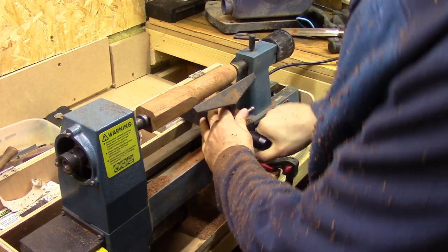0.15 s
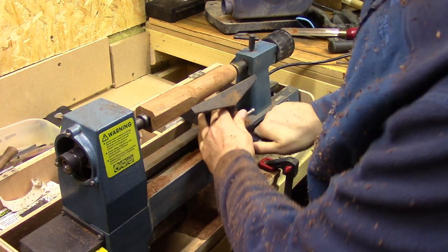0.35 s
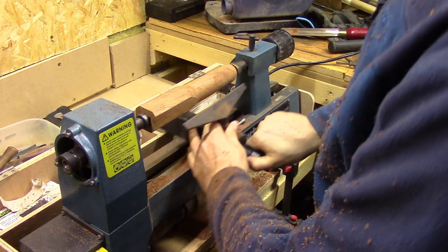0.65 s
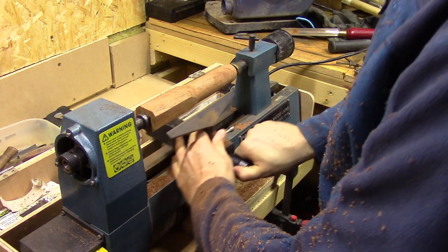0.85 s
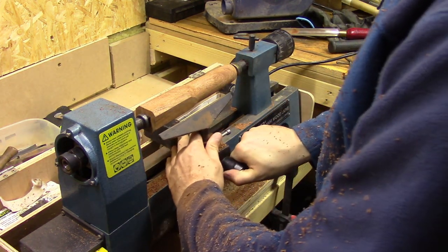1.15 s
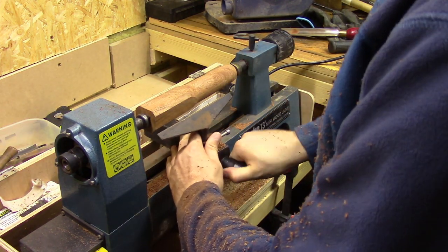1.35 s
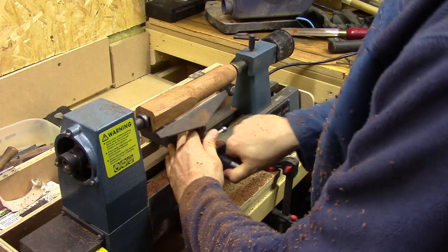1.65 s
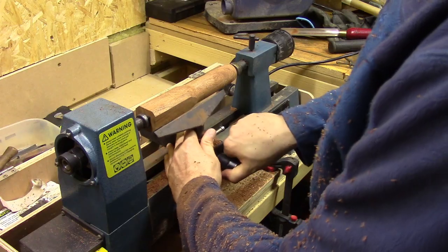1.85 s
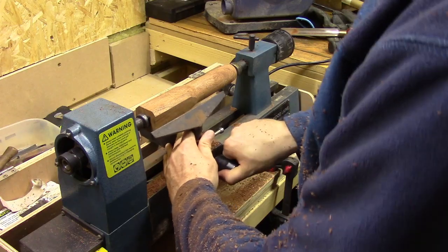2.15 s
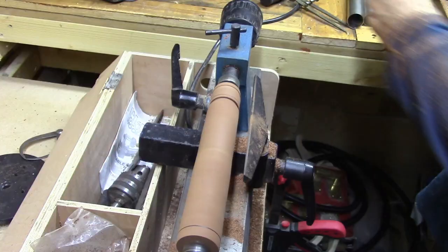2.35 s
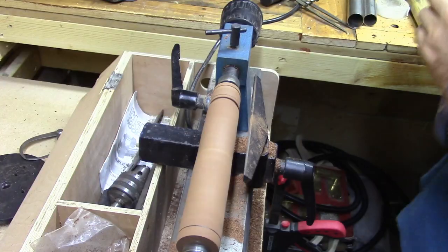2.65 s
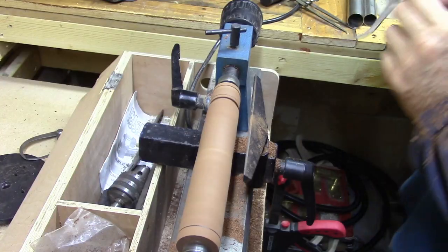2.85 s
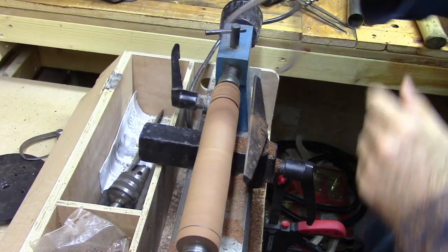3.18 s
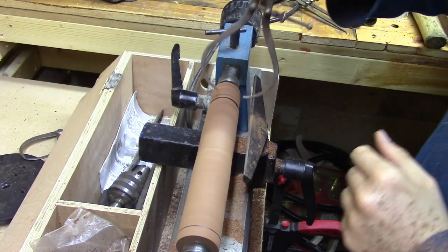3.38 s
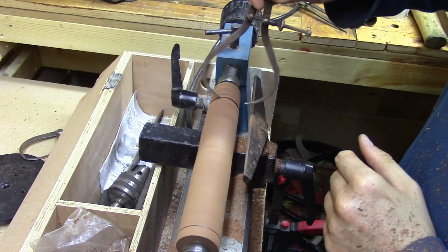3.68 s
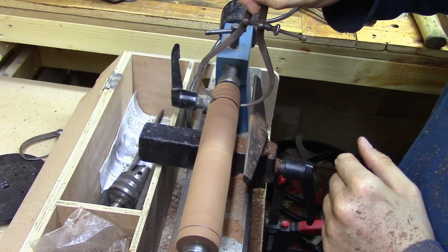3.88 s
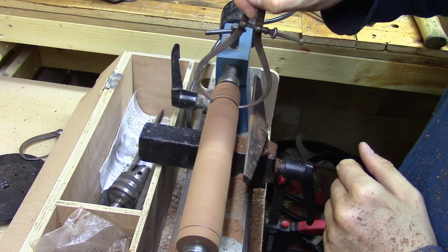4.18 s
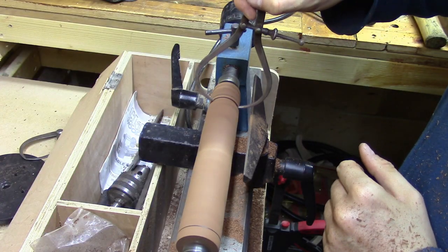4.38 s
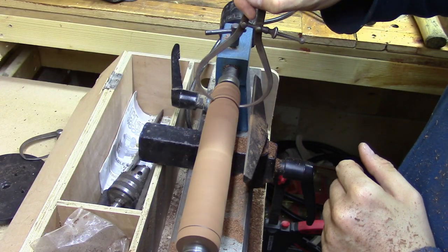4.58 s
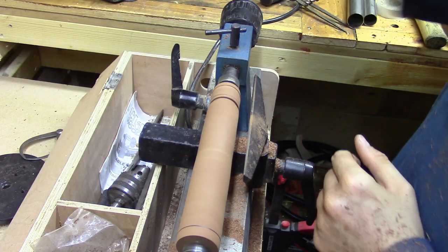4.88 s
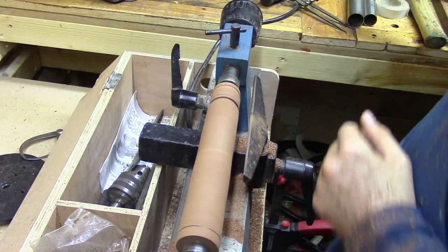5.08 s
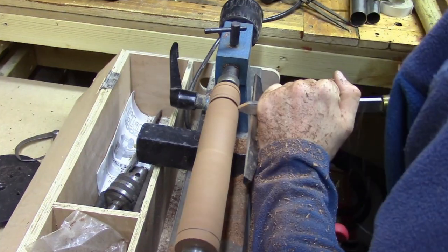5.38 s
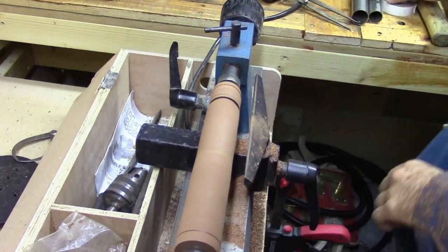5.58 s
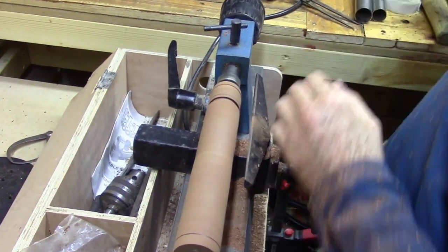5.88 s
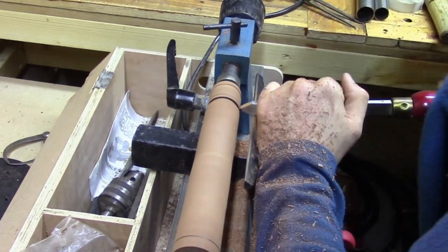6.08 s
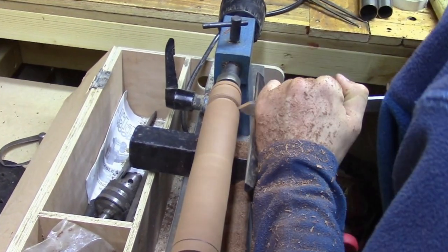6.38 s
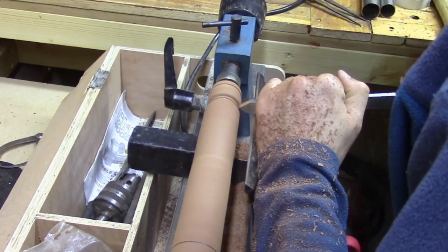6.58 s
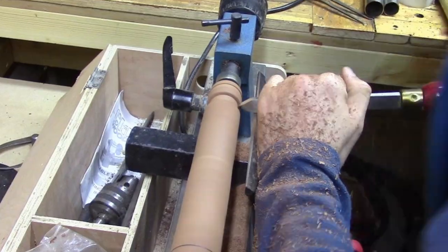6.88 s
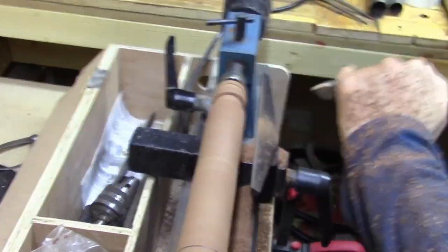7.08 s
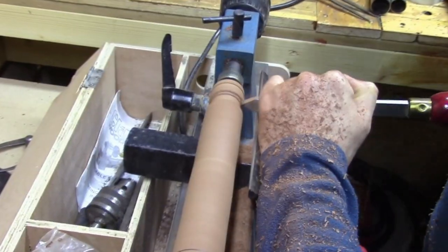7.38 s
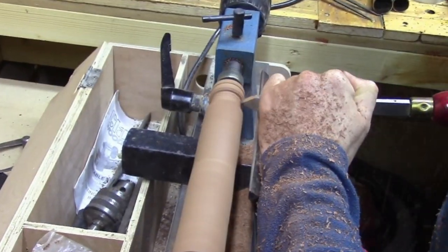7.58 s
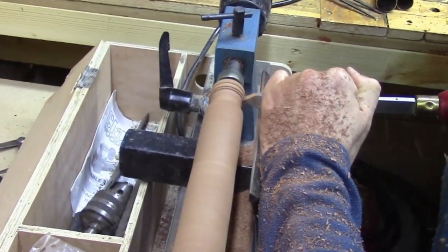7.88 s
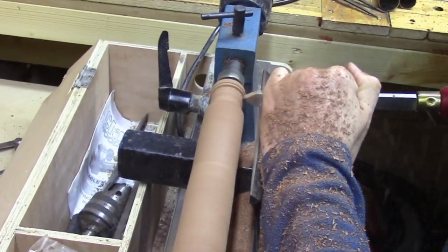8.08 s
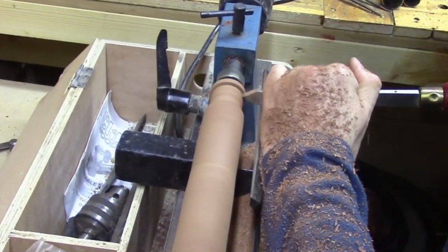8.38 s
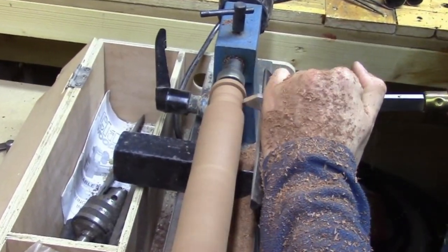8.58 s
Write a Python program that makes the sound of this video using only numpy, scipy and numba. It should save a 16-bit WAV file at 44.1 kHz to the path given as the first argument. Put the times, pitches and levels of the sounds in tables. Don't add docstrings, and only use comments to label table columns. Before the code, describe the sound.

A tool rest slides softly on a metal bed, a small lathe motor suddenly whirrs, then time-lapse chisel cuts chirp and squeal over a racing whine.

```python
import sys
import numpy as np
from scipy import signal
from scipy.fft import rfft, irfft, next_fast_len
from scipy.io import wavfile
from scipy.ndimage import uniform_filter1d, map_coordinates
from numba import njit

SR = 44100
rng = np.random.default_rng(int(sys.argv[2]) if len(sys.argv) > 2 else 0)


def attenuation_scalar(level_db):
    decades = np.asarray(level_db, float) / 20
    return 10 ** decades


def unload_audio(sound):
    columns = np.transpose(np.atleast_2d(sound))
    steps = np.round(np.clip(columns, -1, 1) * 32767)
    wavfile.write(sys.argv[1], SR, steps.astype(np.int16))


N = 385434
MOTOR_ON, LAPSE_ON = 2.3595, 5.191


def unit(x):
    return x / np.sqrt(np.mean(x ** 2) + 1e-20)


def along(points, hz):
    f, value = np.transpose(points)
    return np.interp(np.log(hz + 1), np.log(f + 1), value)


def span(start, end, fade):
    t = np.arange(N) / SR
    return np.clip(np.minimum(t - start, end - t) / fade + 0.5, 0, 1)


def wobble(rate):
    knots = rng.standard_normal(int(N * rate / SR) + 4)
    return map_coordinates(knots, [np.arange(N) * rate / SR], order=1)


def filtered(x, response):
    m = next_fast_len(N + 8192)
    return irfft(rfft(x, m) * response(np.fft.rfftfreq(m, 1 / SR)), m)[..., :N]


def resonances(modes, f, lift_db=0, power=1):
    return sum(attenuation_scalar(power * (db + lift_db)) / (1 + (2 * (f - hz) / width) ** 2) for hz, width, db in modes)


def noise(spectrum, modes, lift_db=0):
    def response(f):
        return attenuation_scalar(along(spectrum, f)) * np.sqrt(1 + resonances(modes, f, lift_db, power=2))
    return unit(filtered(rng.standard_normal(N), response))


def tones(lines, turns, unsteady_db, rate):
    out = np.zeros(N)
    for hz, db in lines:
        wave = np.sin(2 * np.pi * (hz * turns + rng.random()) + 0.5 * wobble(rate))
        out += attenuation_scalar(db + 3 + unsteady_db * wobble(rate)) * wave
    return out


def knocks(rows, crack_db):
    out, t = np.zeros(N + SR), np.arange(SR // 4) / SR
    for start, db, hz, t60 in rows:
        ring = sum(g * np.sin(2 * np.pi * hz * ratio * t) for ratio, g in [(1, 0.64), (0.86, 0.14), (1.3, 0.31)])
        ring = ring * attenuation_scalar(-60 * t / t60) * (1 - np.exp(-t / 0.0015))
        crack = attenuation_scalar(crack_db - 60 * t / 0.092) * uniform_filter1d(rng.standard_normal(len(t)), size=3)
        out[round(start * SR):][:len(t)] += attenuation_scalar(db + 1) * (ring + crack)
    return out[:N]


def held(rows, column, rest, smooth):
    out = np.full(N, float(rest))
    for row in rows:
        out[round((row[0] - 0.0012) * SR):round((row[1] + 0.0012) * SR)] = column(row)
    return uniform_filter1d(uniform_filter1d(out, int(smooth * SR)), int(smooth * SR))


def lagged(x, seconds):
    keep = np.exp(-1 / (seconds * SR))
    return signal.lfilter([1 - keep], [1, -keep], x)


@njit
def slewed(goal, fall, rise, catch_up):
    out = goal.copy()
    for i in range(1, len(out)):
        gap = goal[i] - out[i - 1]
        out[i] = out[i - 1] + min(max(gap, -fall), rise + catch_up * abs(gap))
    return out


# (start t/s, end t/s, force level/dB, loaded spindle f/Hz)
CUTS = [(5.205, 5.256, 2.5, 480), (5.272, 5.326, 6.5, 435), (5.338, 5.383, 4.5, 404),
        (5.397, 5.442, 3, 394), (5.46, 5.5, 2, 430), (6.188, 6.23, -7.5, 525), (6.232, 6.267, 3, 460),
        (6.325, 6.4, 11.5, 450), (6.401, 6.455, -2.5, 470), (6.467, 6.516, 1.5, 434),
        (6.562, 6.597, 11, 430), (6.599, 6.684, 18, 480), (6.742, 6.838, 9, 450), (6.876, 6.956, 13, 477),
        (7.378, 7.506, 3.5, 470), (7.545, 7.587, 5, 488), (7.587, 7.665, 15.5, 490), (7.722, 7.778, 8, 510),
        (7.806, 7.895, 4, 452), (7.924, 8.005, 8.5, 445), (8.05, 8.157, 14.5, 470),
        (8.212, 8.284, 8.5, 483), (8.338, 8.369, 4.5, 480), (8.376, 8.415, 2.5, 503),
        (8.436, 8.47, 4.5, 472), (8.562, 8.585, 2, 500), (8.596, 8.612, 2.5, 480), (8.624, 8.645, 7, 510),
        (8.65, 8.667, -5, 506), (8.672, 8.686, 2, 389)]
# (start t/s, end t/s)
LOW_MODE = [(5.317, 5.03), (6.345, 6.372), (6.87, 7.25), (7.71, 7.78), (7.835, 8.2), (7.92, 7.7),
            (8.04, 8.08), (8.1, 8.115), (8.2, 8.05), (8.33, 8.39), (8.555, 8.59)]
# (f/Hz, width f/Hz, level/dB)
BLADE_MODES = [(8300, 1150, -5.5), (9370, 690, -3), (10755, 105, 8), (12910, 310, -0.5), (13150, 460, 0)]
# (f/Hz, level/dB per Hz)
SHAVINGS = [(3240, -23.5), (5500, -0.5), (7280, -6), (8420, -9), (10100, -6), (12700, 4.5), (15900, -12)]
SQUEEZE, OPEN_DB = 0.97, 1.5


def chisel(speed, gain_db):
    high_mode_hz, low_mode_hz, spread_hz = 4480, 4000, 0.71 * 480
    centre = held(LOW_MODE, lambda spell: low_mode_hz, high_mode_hz, 0.003) + 90 * wobble(50)
    force = held(CUTS, lambda cut: cut[2], 0, 0.0055)
    spread = spread_hz * np.exp(-0.055 * force + 0.19 * wobble(55))
    angle = 2 * np.pi * np.cumsum(speed) / SR

    stack, power = np.zeros(N), np.zeros(N)
    for k in range(6, 14):
        near_mode = np.exp(-((k * speed - centre) / spread) ** 2 / 2) + 0.06
        size = attenuation_scalar(2.5 * wobble(70)) * near_mode
        stack += size * np.sin(k * angle + 0.5 * wobble(90) + 6 * rng.random())
        power += size ** 2 / 2
    stack = stack / np.sqrt(power)
    overtones = 0.045 * (stack ** 2 - 1) + 0.0056 * stack ** 3
    chatter = filtered(stack + overtones, lambda f: 1 / (1 + (3300 / (f + 1)) ** 16))
    tear = attenuation_scalar(-12.5) * noise([(2000, -44), (3200, -3), (3900, 9), (4600, -1), (5600, -32), (8000, -39)], [])

    bites = np.zeros(N)
    for k in range(13, 33):
        bites += attenuation_scalar(6.2 * wobble(80)) * np.sin(k * angle + 0.5 * wobble(110) + 6 * rng.random())
    blade = unit(filtered(bites, lambda f: resonances(BLADE_MODES, f)))
    shavings = attenuation_scalar(-20.5 + 2.5 * wobble(120)) * noise(SHAVINGS, []) + attenuation_scalar(-21.0) * blade

    light_db, bite, feed_s = -12, 0.39, 0.014

    def settled(cut):
        return attenuation_scalar(light_db + (1 - SQUEEZE + bite * SQUEEZE) * cut[2] + min(cut[2], 0))

    heard = attenuation_scalar(bite * gain_db) * held(CUTS, settled, 0, 0.003)
    heard = heard * slewed(held(CUTS, lambda cut: 1, 0, 0.003), 0.001, 1 / (feed_s * SR), 0.)
    cutting = attenuation_scalar(0.94 * wobble(25)) * held(CUTS, lambda cut: 1, 0, 0.0054)
    return attenuation_scalar(1.5 * wobble(70)) * heard * (chatter + tear) + cutting * shavings


def spindle():
    free_hz, sag_hz_per_s, regain_s = 558, 2200, 0.017
    governor_s, overshoot, wander_hz = 0.035, 0.3, 4
    drag = held(CUTS, lambda cut: free_hz - cut[3], 0, 0.001)
    goal = free_hz - (1 + overshoot) * drag + overshoot * np.minimum(lagged(drag, governor_s), drag)
    speed = slewed(goal, sag_hz_per_s / SR, 0., 1 / (regain_s * SR))
    return uniform_filter1d(speed, int(0.006 * SR)) + wander_hz * wobble(45)


def gain_control():
    duck_s, recover_db_per_s = 0.017, 161
    excess = held(CUTS, lambda cut: max(cut[2], 0) + OPEN_DB, 0, 0.0018)
    need = -SQUEEZE * lagged(excess, duck_s)
    ramp = recover_db_per_s * np.arange(N) / SR
    return OPEN_DB + ramp + np.minimum.accumulate(need - ramp)


# (f/Hz, level/dB)
SHAFT_ORDERS = [(257.1, -38.5), (275.6, -39), (312.2, -34.5), (326.4, -39.5), (330.4, -36.5), (348.9, -36),
                (371.8, -57), (378.8, -39), (385.2, -48.5), (445.8, -24.5), (459.3, -32), (481.5, -38),
                (652.7, -29.5), (668.9, -31), (891.9, -32), (960.9, -46), (979.4, -20), (997.6, -42),
                (1096.8, -33.5), (1115.0, -23.5), (1133.5, -38), (1176.3, -44), (1187.4, -41.5),
                (1244.6, -28.5), (1300.1, -28.5), (1338.1, -31), (1596.8, -40), (1632.1, -31)]
# (f/Hz, level/dB per Hz)
FAST_WHIRR = [(15, -51), (25, -14.5), (393, -12), (2530, -7.5), (2900, -12), (3230, -5), (3700, -13),
              (4470, -9.5), (5110, -11.5), (6700, -9), (7670, -13), (9520, -9), (10300, -10.5),
              (13200, -7.5), (15900, -10)]


def lapse():
    speed, gain_db = spindle(), gain_control()
    load = 0.17 * lagged(held(CUTS, lambda cut: min(1, 1 + cut[2] / 12), 0, 0.0118), 0.01)
    turns = 10.008 * np.cumsum(1 - load) / SR
    audible = [line for line in SHAFT_ORDERS if line[0] < 1550]
    orders = attenuation_scalar(-1.0 - 39 * load) * tones(audible, turns, unsteady_db=1.0, rate=74)
    casing = [(4530, 170, 1.3), (10960, 440, 7.9), (13000, 790, 5.8)]  # f/Hz, width f/Hz, level/dB
    whirr = attenuation_scalar(-19.5 + 1.75 * wobble(200)) * noise(FAST_WHIRR, casing)
    return (attenuation_scalar(gain_db) * (orders + whirr) + chisel(speed, gain_db)) * span(LAPSE_ON, 99, 0.0036)


# (t/s, level/dB)
IDLE = [
    (2.36, -10),
    (2.43, -11),
    (5.19, -12.5),
]
# (f/Hz, level/dB)
HUM = [(59.5, -56.5), (129.2, -43.5), (166.5, -49.5), (220.7, -49.5), (2549.5, -29)]
# (f/Hz, level/dB)
WHINE = [(2304, -30.5), (2573, -29), (2875, -31.5), (3935, -39.5), (4479, -47), (4587, -33.5), (6724, -29),
         (7752, -38.5), (11208, -41.5), (11300, -48), (12812, -37), (13442, -61)]
# (f/Hz, level/dB per Hz)
WHIRR = [(15, -72), (25, -63), (313, -10.5), (389, -20), (445, -10.5), (582, -16), (666, -17), (762, -20),
         (970, -11), (1450, -11), (2560, -10.5), (3720, -15.5), (12500, -28), (14300, -30.5), (15500, -58)]
# (f/Hz, width f/Hz, level/dB)
CASING = [(420, 38, -0.5), (1220, 120, 5), (2296, 110, 4.5), (2598, 93, 8.5), (2967, 60, 6),
          (4690, 300, 6.5), (7750, 560, 1.5), (12800, 260, 5)]
# (t/s, peak level/dB, f/Hz, t60/s)
CALIPER = [
    (4.28, -4, 380, 0.13),
    (4.425, -7, 386, 0.085),
    (4.592, -2.5, 390, 0.097),
]


def idling_lathe():
    t = np.arange(N) / SR
    lap = round(SR / 18.42)
    belt = np.resize(noise(WHIRR, CASING)[:lap], N)
    throb = 1 + 0.076 * np.sin(2 * np.pi * 39.0 * t) + 0.13 * np.sin(2 * np.pi * 326.3 * t)
    rough = attenuation_scalar(-19.5) * noise(WHIRR, CASING) + attenuation_scalar(-22) * belt
    whirr = attenuation_scalar(1.34 * wobble(90)) * throb * rough
    orders = tones(SHAFT_ORDERS + HUM, t, unsteady_db=1.0, rate=12)
    whine = tones(WHINE, t, unsteady_db=2.5, rate=70)
    times, levels = np.transpose(IDLE)
    motor = attenuation_scalar(np.interp(t, times, levels) + 12.0) * (whirr + orders + whine)
    return (motor + knocks(CALIPER, crack_db=-15)) * span(MOTOR_ON, LAPSE_ON, 0.00052)


# (start t/s,
# end t/s, scrape level/dB, grit level/dB)
STROKES = [(0.049, 0.065, -40.5, -50.5), (.1, .2, -56, -71), (0.412, 0.48, -38, -55),
           (0.495, 0.574, -32.5, -42), (0.604, 0.873, -35, -46), (0.88, 0.934, -34.5, -45),
           (1.131, 1.142, -40.5, -53), (1.29, 1.382, -59, -60), (1.42, 1.56, -53.5, -51.5),
           (1.628, 1.656, -41.5, -55), (1.696, 1.775, -42.5, -51), (2.0, 2.027, -47, -55.5),
           (2.23, 2.254, -48, -71), (2.37, 2.4, -48, -39)]


def slide():
    push_db_per_s, settle_db_per_s = 332, 238
    t = np.arange(N) / SR
    scrape, grit = attenuation_scalar(2 * -65), attenuation_scalar(2 * -81)
    for start, end, scrape_db, grit_db in STROKES:
        loss = push_db_per_s * np.maximum(start - t, 0) + settle_db_per_s * np.maximum(t - end, 0)
        scrape = scrape + attenuation_scalar(2 * (scrape_db - loss))
        grit = grit + attenuation_scalar(2 * (grit_db - loss))
    return 10 * np.log10(scrape), 10 * np.log10(grit)


# (f/Hz, width f/Hz, level/dB)
BED = [(468, 16, -1), (640, 23, -12), (1084, 17, 0), (1262, 14, 1.5), (1440, 28, -20), (2770, 180, -16),
       (3230, 15, -13), (4330, 80, -14), (5570, 390, -23), (6650, 79, -15), (8070, 88, -22)]
# (f/Hz, level/dB per Hz)
SCRAPE = [(35, -66), (60, -29), (119, -19), (258, -1), (644, -1.5), (1720, -13), (2760, -28), (3000, -32),
          (3900, -56), (6600, -120)]
# (f/Hz, level/dB per Hz)
GRIT = [(880, -30), (1500, 4), (2700, -8), (5040, -2.5), (7980, -12), (9420, -13), (15500, -16)]
# (t/s, peak level/dB, f/Hz, t60/s)
KNOCKS = [
    (0.038, -28, 2470, 0.041),
    (0.072, -23, 474, 0.085),
    (0.178, -39, 642, 0.11),
    (0.393, -22, 407, 0.13),
    (0.519, -23.5, 667, 0.15),
    (0.907, -25, 610, 0.087),
    (1.615, -34, 462, 0.08),
    (1.739, -33, 470, 0.12),
    (2.1, -34, 340, 0.11),
    (2.234, -35, 482, 0.12),
]
# (t/s, peak level/dB)
TICKS = [
    (0.037, -35),
    (0.6497, -34),
    (1.0071, -46),
    (1.295, -45),
    (1.4436, -39),
    (1.5523, -41),
    (1.9847, -43.5),
    (2.0444, -47),
    (2.2528, -53),
]


def tool_rest():
    scrape_db, grit_db = slide()
    slips = attenuation_scalar(1.5 * wobble(60.04) + 0.73 * wobble(300))
    scrape = attenuation_scalar(scrape_db - 2.0) * unit(slips * noise(SCRAPE, BED[:5], lift_db=8))
    ringing = np.clip((scrape_db - grit_db - 5) / 6, 0, 1)
    high_modes = noise([(1500, -63), (2200, 1), (9000, -10.0), (15000, -28)], BED[5:], lift_db=27.5)
    sing = unit(attenuation_scalar(4.2 * wobble(12.99)) * slips * high_modes)
    grit = unit(attenuation_scalar(1.6 * wobble(140)) * noise(GRIT, []))
    high = attenuation_scalar(grit_db) * (ringing * sing + (1 - ringing) * grit)
    ticks = knocks([(t, db, 0, 0.02) for t, db in TICKS], crack_db=-2.5)
    return (scrape + high + knocks(KNOCKS, crack_db=-32) + ticks) * span(-1, MOTOR_ON, 0.002)


# (f/Hz, level/dB per Hz)
SHOP = [(15, -47), (25, -16), (475, -3.5), (1350, -15), (1580, -12.5), (10000, -29.5), (15000, -30)]


def shop_air():
    return attenuation_scalar(-57.0) * noise(SHOP, []) * span(-1, MOTOR_ON, 0.002)


# (f/Hz, side minus mid level/dB)
APART = [(60, -9), (180, -15), (550, -21.5), (1650, -20), (4970, -18), (15000, -14)]


def scene():
    dry = tool_rest() + idling_lathe() + lapse() + shop_air()
    t = np.arange(SR // 8) / SR
    walls = rng.standard_normal(len(t)) * attenuation_scalar(-60 * t / 0.029)

    def scattered(f):
        phase = 0.8 * np.sin(np.angle(rfft(walls, 2 * len(f) - 1)))
        return attenuation_scalar(along(APART, f)) * 1j * np.exp(1j * phase)

    side = filtered(dry, scattered)
    return np.array([attenuation_scalar(0.17) * (dry + side), attenuation_scalar(0.53) * (dry - side)])


def top_cut(x):
    return signal.sosfilt(signal.butter(12, 17080, fs=SR, output="sos"), x)


def record(dry):
    mix = filtered(dry, lambda f: f < 15900)
    mix = mix / (1 + np.abs(mix / 1.01) ** 4) ** (1 / 4)
    return top_cut(mix)


dry = scene()
out = record(dry)
unload_audio(out)
```